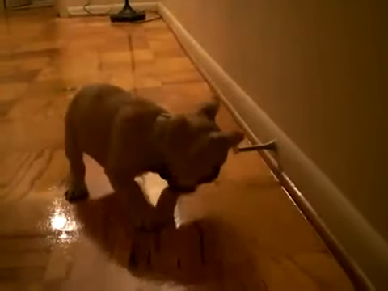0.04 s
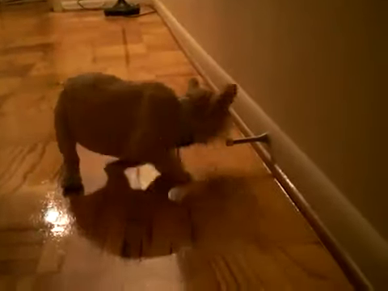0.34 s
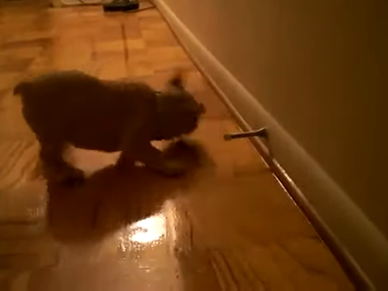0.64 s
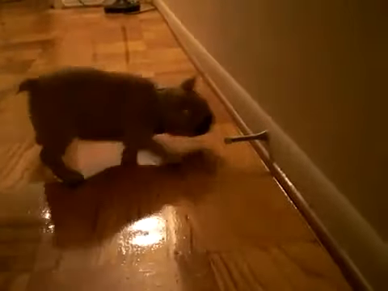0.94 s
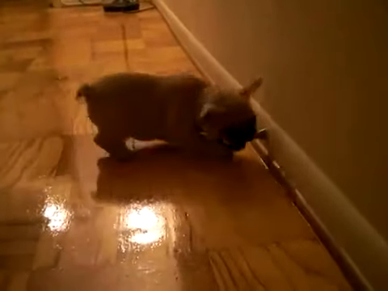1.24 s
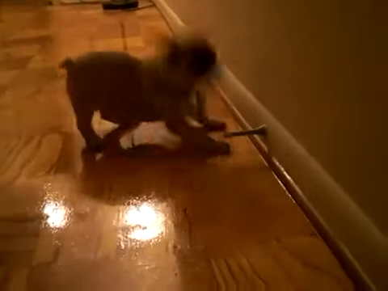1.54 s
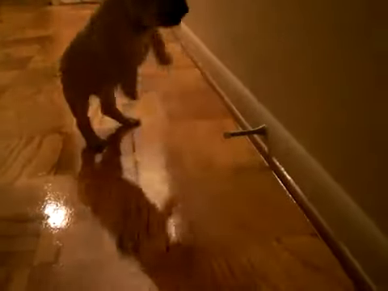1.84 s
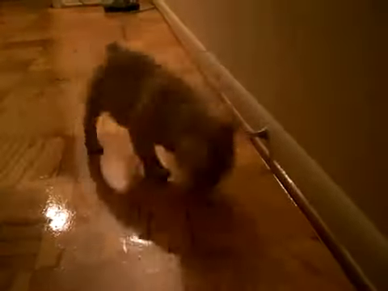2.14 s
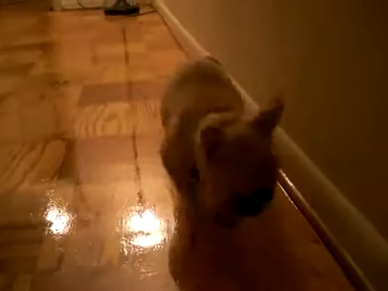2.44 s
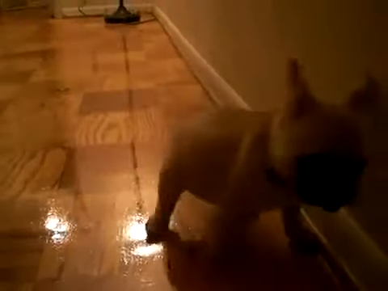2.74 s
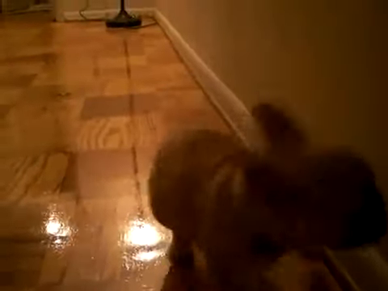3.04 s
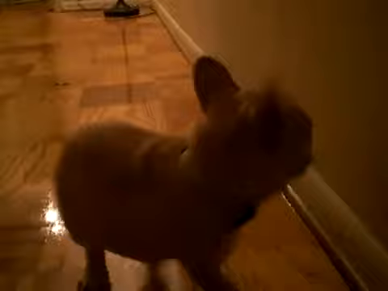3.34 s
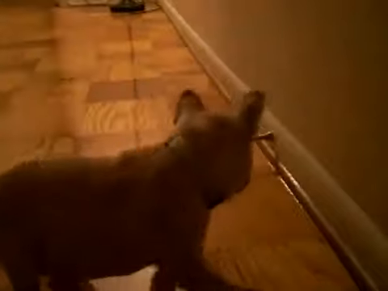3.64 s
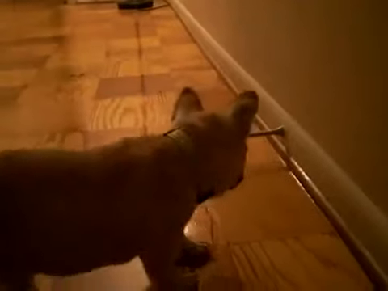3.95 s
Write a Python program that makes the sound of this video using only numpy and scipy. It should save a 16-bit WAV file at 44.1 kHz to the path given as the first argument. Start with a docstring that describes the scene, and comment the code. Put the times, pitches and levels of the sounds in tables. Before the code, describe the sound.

A metal spring door stop twangs, buzzes and rattles as a puppy paws at it.

```python
"""A quiet room with a wooden floor: a puppy paws at a spring door stop on the skirting board.
Its paws skid and scrape and its collar tag clinks; it brushes the spring, then lets it fly.
At each swing the coils slap shut: a short falling chirp knocks the board and the coils chatter."""
import sys
import numpy as np
from scipy import signal
from scipy.fft import rfft, irfft
from scipy.io import wavfile
from scipy.ndimage import uniform_filter1d

SR = 44100
rng = np.random.default_rng(int(sys.argv[2]) if len(sys.argv) > 2 else 0)


def waveform_to_disk(signal):
    """Save audio, clipped to [-1, 1], as 16-bit WAV at the path in sys.argv[1]."""
    frames = np.transpose(np.atleast_2d(signal))
    scaled = np.clip(frames, -1, 1) * 32767
    samples = np.round(scaled).astype(np.int16)
    wavfile.write(sys.argv[1], SR, samples)


N = 176400
T = np.arange(N) / SR
CHIRP_S = 0.001266  # delay along the wire near 1 kHz
CONTACT_S, GRIT_RISE_S, REBOUND_DB = 0.0008, 0.0007, -13
# loose coil buzz between slaps: t/s, level/dB
BUZZ_ENVELOPE = [(1.42, -60), (1.46, -39.5), (1.57, -41), (1.69, -39.5), (1.8, -47), (2.0, -55),
                 (2.12, -54.5), (2.22, -34.5), (2.55, -40), (2.7, -34), (2.83, -40.5), (3.2, -37),
                 (3.45, -40.5), (4, -42)]


def amp(db):
    """Decibels to gain."""
    return 10 ** (np.asarray(db) / 20)


def unit(x):
    """Scale to rms 1."""
    return x / np.sqrt(np.mean(x ** 2) + 1e-20)


def ring(x, response):
    """Play a signal through a response."""
    return signal.fftconvolve(x, response)[:N]


def body(colour, chirp_s=0, size=4096):
    """Causal response of an (f/Hz, level/dB) colour, peak 1; chirp_s makes the lows arrive later."""
    f = np.arange(size // 2 + 1) * SR / size + 1
    hz, db = np.array(colour).T
    cepstrum = irfft(np.log(amp(np.interp(np.log(f), np.log(hz), db))))
    cepstrum[1:size // 2] *= 2  # fold to minimum phase
    cepstrum[size // 2 + 1:] = 0
    lag_s = chirp_s * np.sqrt(1000 / (f + 100))
    response = irfft(np.exp(rfft(cepstrum) - 2j * np.pi * np.cumsum(lag_s) * SR / size))[:size // 2]
    return response / np.abs(response).max()


def tint(x, colour, chirp_s=0):
    """Colour a noise at constant power."""
    response = body(colour, chirp_s)
    return ring(x, response / np.linalg.norm(response))


def modes(rows, t=T[:SR]):
    """Fading sines from (f/Hz, level/dB, t60/s) rows."""
    return sum(amp(db) * np.sin(2 * np.pi * hz * t) * 1000 ** (-t / t60_s) for hz, db, t60_s in rows)


def pings(rows, t60_s):
    """Short fading tones from (t/s, level/dB, f/Hz) rows."""
    x, t = np.zeros(N + SR), T[:int(t60_s * SR) + 1]
    for s, db, hz in rows:
        start = int(s * SR)
        x[start:start + len(t)] += modes([(hz, db, t60_s)], t) * (1 - np.exp(-t * hz))
    return x[:N]


def blows(rows, delay_s=0):
    """An impulse for each (t/s, level/dB, ...) row."""
    x = np.zeros(N)
    for s, db, *_ in rows:
        x[int((s + delay_s) * SR)] += amp(db)
    return x


def swells(rows, rise_s, fall_s):
    """Envelope that rises to each (t/s, level/dB, ...) row and dies away."""
    envelope = np.zeros(N)
    for s, db, *_ in rows:
        a, b = np.searchsorted(T, [s - 4 * rise_s, s + 10 * fall_s])
        t = T[a:b] - s
        envelope[a:b] += amp(db) * np.exp(np.where(t < 0, -(t / rise_s) ** 2, -t / fall_s))
    return envelope


def ticks(per_s=3000):
    """Random tiny contacts, rms 1."""
    return unit(rng.standard_normal(N) * (rng.random(N) < per_s / SR))


def clumps(depth_db, length_s):
    """A gain that jumps about at random."""
    return amp(depth_db * unit(uniform_filter1d(rng.standard_normal(N), int(length_s * SR) + 1)))


def background():
    """Soft room air, an appliance's hum and a faint ring dying away at the start."""
    air_colour = [(15, -11), (25, -2), (92, -5.5), (149, -5.5), (301, -10.5), (607, -8.5), (714, -13),
                  (2760, -20), (3250, -27), (14800, -32.5), (16000, -34)]  # f/Hz, level/dB
    hum_tones = [(120, -60), (146.5, -56), (2826, -68.5)]  # f/Hz, rms level/dB
    faint_ring = [(568, -49.5, 1.2), (627, -49, 0.95)]  # f/Hz, level/dB, t60/s
    hum = sum(amp(db) * np.sqrt(2) * np.sin(2 * np.pi * (hz * T + rng.random())) for hz, db in hum_tones)
    air = amp(-50.5) * tint(rng.standard_normal(N), air_colour)
    return air + hum + np.pad(modes(faint_ring), (0, N - SR))


def room(x, delay_s=0.009):
    """Diffuse echo, shortest in the top treble."""
    bands = [(250, 0.63, 1.5), (900, 0.48, 0.5), (2170, 0.63, 0.5), (5850, 0.54, -8), (11900, 0.053, -3)]  # f/Hz, t60/s, level/dB
    f, t = np.arange(SR // 2 + 1) + 1., T[:SR]
    centres_hz = [hz for hz, _, _ in bands]
    spectrum, tail = rfft(rng.standard_normal(SR)), 0
    for share, (_, t60_s, db) in zip(np.eye(len(bands)), bands):
        band = irfft(spectrum * np.interp(np.log(f), np.log(centres_hz), share))
        fade = 1000 ** (-t / t60_s) * (t > delay_s)
        tail += amp(db) * band * fade / np.linalg.norm(fade)
    return amp(-5.5) * ring(x, tail)


def tag(top_rise_s=0.0035):
    """The metal tag ticks against the collar and rings in close, beating pairs."""
    clinks = [(0.7893, -25.5, -3), (.817, -45, 22), (0.8268, -26, 8.5), (0.876, -54.5, 25)]  # t/s, level/dB, top modes' offset/dB
    tag_modes = [(3600, -17, 0.06), (5230, -4, 0.12), (5240, -3, 0.1), (5233, -22.5, 0.4),
                 (11340, -12, 0.14), (11350, -12, 0.11)]  # f/Hz, level/dB, t60/s
    tick_colour = [(500, -14), (1800, -15), (3000, 1.5), (5500, -5), (7000, -6), (16000, -20)]  # f/Hz, level/dB
    hits = blows(clinks)
    top_hits = blows([(s, db + top_db) for s, db, top_db in clinks])
    top = modes(tag_modes[-2:]) * (1 - np.exp(-T[:SR] / top_rise_s))
    return ring(hits, modes(tag_modes[:-2])) + ring(top_hits, top) + amp(9) * ring(hits, body(tick_colour))


def rubbing():
    """Paws and collar catch and slip: bands of grainy noise."""
    rubs = [(0.385, 0.0037, 0.0097, -32.5, 1830, 900), (0.389, 0.0039, 0.023, -39, 7740, 6040),
            (.46, 0.048, 0.046, -44, 218, 159), (0.485, 0.008, 0.048, -41, 6450, 6070),
            (.635, 0.031, 0.071, -43, 12000, 7400), (.66, 0.025, 0.1, -35, 1760, 1050),
            (0.661, .012, 0.028, -32, 4540, 1450), (.825, 0.02, 0.031, -44, 11940, 2500),
            (1.08, 0.069, 0.46, -52.5, 7100, 9000), (1.196, 0.058, 0.029, -33, 12900, 3940),
            (1.195, 0.033, 0.018, -44.5, 730, 1050), (1.259, 0.005, 0.033, -40, 3220, 700),
            (1.27, 0.11, 0.06, -43.5, 7900, 10500), (1.54, 0.057, 0.07, -43, 1100, 1200),
            (1.595, 0.0085, 0.0092, -42, 3130, 400), (1.685, 0.012, 0.015, -38.5, 3200, 300),
            (1.75, 0.19, 0.081, -49.5, 14700, 4000)]  # t/s, rise/s, fall/s, level/dB, centre/Hz, width/Hz
    f = np.arange(N // 2 + 1) * SR / N + 1
    grip, out = clumps(depth_db=2, length_s=0.005), 0
    for s, rise_s, fall_s, db, hz, width_hz in rubs:
        band = (1 + ((f / hz - hz / f) * hz / width_hz / 2) ** 2) ** -2
        friction = unit(irfft(rfft(ticks(per_s=9000) * grip) * band, N))
        out += swells([(s, db)], rise_s, fall_s) * friction
    return out


def claws():
    """Claws tap the floorboards."""
    taps = [(.166, -32), (.6385, -18), (.641, -24), (.662, -24), (.7295, -19.5), (1.3305, -26)]  # t/s, level/dB
    tap_colour = [(200, -35), (1000, -0.5), (1600, -9.5), (2050, 6.5), (2900, -15), (4600, -11),
                  (7000, -18), (16000, -32)]  # f/Hz, level/dB
    return ring(blows(taps), body(tap_colour, chirp_s=0.001155))


def skid(start_s=0.3822, period_s=0.0226, squeak_hz=1875, sag_hz_per_s=6200):
    """A paw judders: the pad drags after each catch, and the squeak falls as it slows."""
    catch_levels = [-25, -16.5, -19, -24, -28, -32]  # level/dB
    skid_colour = [(80, -12), (200, -6), (420, -3.5), (1100, -6), (1700, 6), (2300, -3), (5000, -15),
                   (10000, -21), (16000, -30)]  # f/Hz, level/dB
    catches = [(start_s + k * period_s, db) for k, db in enumerate(catch_levels)]
    drag = amp(-24.5) * swells(catches, GRIT_RISE_S, fall_s=0.0051) * ticks()
    judder = ring(blows(catches) + drag, body(skid_colour, chirp_s=0.000696))
    squeaks = [(s, db - 12, squeak_hz - sag_hz_per_s * (s - start_s)) for s, db in catches]
    return judder + pings(squeaks, t60_s=0.013)


def coil_buzz():
    """Loose coils buzz in small uneven clumps."""
    buzz_colour = [(200, -4), (550, 12), (1000, 14.5), (2400, 6), (3500, 1), (6800, -3), (8000, -3),
                   (11000, -4), (16000, -19)]  # f/Hz, level/dB
    envelope = amp(np.interp(T, *np.array(BUZZ_ENVELOPE).T))
    crackle = unit(ticks() * clumps(depth_db=4, length_s=0.002))
    return tint(envelope * crackle, buzz_colour, CHIRP_S)


def coil_pings(contacts, spread_s=0.0043, strays_per_band_per_s=110):
    """Single coils ping at their own pitches: two per band at each slap, strays during the buzz."""
    bands = [(1095, 2130, 3), (2140, 5080, 1), (5250, 7360, -1.5), (8830, 14000, -8.5)]  # low/Hz, high/Hz, level/dB
    buzz_s, buzz_db = np.array(BUZZ_ENVELOPE).T
    rows = []
    for low_hz, high_hz, band_db in bands:
        span_hz = high_hz - low_hz
        for s, db in contacts:
            for late, pitch in rng.random((2, 2)):
                rows.append((s + spread_s * (2 * late - .5), db + band_db - 2.5, low_hz + span_hz * pitch))
        for when, pitch, size, chance in rng.random((N // 100, 4)):
            s = when * T[-1]
            if s > buzz_s[0] and chance < strays_per_band_per_s * 100 / SR:
                db = np.interp(s, buzz_s, buzz_db) + band_db + 0.5 + 10 * size
                rows.append((s, db, low_hz + span_hz * pitch))
    return pings(rows, t60_s=0.011)


def coil_chatter(contacts, fall_s=0.003):
    """The coils snap together, chatter and grate sideways, now more, now less."""
    chatter_colour = [(400, 5.5), (1200, 9), (2400, 11), (3400, 1.5), (7000, 1), (8000, -1.5), (10000, -8),
                      (13000, -14), (16000, -14)]  # f/Hz, level/dB
    grates = [(2.7991, -32.5), (2.8502, -25.5), (2.8515, -34), (3.2825, -27.5), (3.318, -31)]  # t/s, level/dB
    grate_colour = [(2500, -38), (10000, 17), (16000, -20)]  # f/Hz, level/dB
    snap = amp(-22) * ring(blows(contacts), body(chatter_colour, CHIRP_S))
    envelope = amp(-1) * swells(contacts, rise_s=0.002, fall_s=fall_s)
    grating = amp(-16.5) * envelope * clumps(depth_db=4, length_s=0.027)
    grating += swells(grates, GRIT_RISE_S, fall_s)
    chatter = tint(envelope * ticks(), chatter_colour, CHIRP_S)
    return snap + chatter + tint(grating * ticks(), grate_colour, CHIRP_S)


def twang(slaps):
    """Slaps and a few other blows each set one bending mode of the spring ringing."""
    bends = [(1.965, -25, 1390), (2.223, -12, 1080), (2.8545, -11.5, 684), (2.8535, -11, 1285),
             (3.052, -9, 1430), (3.053, -16, 760), (3.188, -15.5, 546)]  # t/s, level/dB, f/Hz
    return pings([(s + CHIRP_S, db - 4, hz) for s, db, _, hz in slaps] + bends, t60_s=0.045)


def knocks(slaps):
    """Each slap sends a falling chirp down the wire, with a rebound and a short rattle."""
    knock_colour = [(100, -32), (220, -42), (320, -21.5), (420, -13.5), (540, 0.5), (900, 3), (1400, 0.5),
                    (2300, -11.5), (2900, -23), (6500, -19), (8000, -28.5), (16000, -26)]  # f/Hz, level/dB
    hits = blows(slaps) + amp(REBOUND_DB) * blows(slaps, delay_s=0.00322)
    rattle = amp(-24.5) * swells(slaps, GRIT_RISE_S, fall_s=0.0063) * ticks()
    return ring(hits + rattle, body(knock_colour, CHIRP_S))


def cracks(split_hz=2340):
    """All coils shut at once: a hard knock and rebound below the split, a gritty crunch above."""
    hits = [(1.5344, -21, -2), (1.6658, -21, -8), (2.2842, -6.5, -5), (2.405, -13, -14), (2.5253, -4, -8),
            (2.6041, -1, -1.5), (2.8774, -3.5, -7.5), (3.0518, -5, -12.5), (3.1612, -3.5, -7),
            (3.291, -5, -12.5)]  # t/s, level/dB, treble offset/dB
    crack_colour = [(100, -17), (400, -9.5), (900, 6), (2700, -4), (5000, -1.5), (7500, -15), (16000, -17)]  # f/Hz, level/dB
    response = body(crack_colour, chirp_s=0.001991)
    f = np.fft.rfftfreq(len(response), 1 / SR)
    dull = irfft(rfft(response) / (1 + (f / split_hz) ** 4))
    low = blows(hits) + amp(REBOUND_DB) * blows(hits, delay_s=0.00176)
    edges = [(s, db + treble_db) for s, db, treble_db in hits]
    crunch = swells([(s + CONTACT_S, db - 20) for s, db in edges], GRIT_RISE_S, fall_s=0.0025) * ticks()
    return ring(low, dull) + ring(blows(edges) + crunch, response - dull)


def spring(treble_follow=0.52, low_cut_hz=336):
    """The swinging spring slaps shut; its knocks and cracks ring the skirting board."""
    # slaps: t/s, level/dB, brightness/dB, twang f/Hz
    nudges = [(1.363, -30, -11, 1170), (1.434, -17.5, -22, 1094), (1.457, -30, 17.5, 1250),
              (1.48, -16, -32, 940), (1.494, -24, -21, 1060), (1.513, -18.5, -37, 860),
              (1.533, -14.5, -23.5, 990), (1.607, -13.5, -26, 976), (1.665, -16, -14.5, 1397),
              (1.749, -18.5, -54, 1085), (1.778, -19, -48, 890), (1.854, -20, -33, 1400),
              (1.895, -18, -45, 805), (1.964, -18.5, -29, 1270), (2.001, -22.5, -44, 1380),
              (2.037, -25, -51, 1080), (2.071, -30, -43, 844)]  # the paw leans on the spring and slips off
    swings = [(2.143, -21.5, -29, 1210), (2.163, -17, -17, 820), (2.193, -12, -3, 770),
              (2.223, -5, -19.5, 875), (2.229, -8.5, -31, 870), (2.256, -13, -2.5, 790),
              (2.29, -6, -22, 921), (2.317, -10.5, -5, 810), (2.345, -10, -9, 830), (2.377, -9, -15, 880),
              (2.405, -5.5, -16, 855), (2.412, -18, -19, 890), (2.438, -12, -12, 925),
              (2.466, -8, -19, 1010), (2.472, -12, -19, 840), (2.498, -9, -13, 930),
              (2.556, -12.5, -7, 610), (2.636, -10.5, -17, 880), (2.665, -13.5, -11.5, 920),
              (2.694, -13.5, -55, 990), (2.725, -17, -12, 1140), (2.785, -15, -18, 1030),
              (2.798, -11, -31, 1250), (2.82, -15, -21, 880), (2.8535, -6, -21, 683),
              (2.9055, -7.5, -23, 990), (2.91, -7.5, -41, 914), (2.937, -14, -9, 1130),
              (2.995, -16, -1, 820), (3.024, -15, -7, 920), (3.0505, -12.5, -1.5, 880),
              (3.0545, -15.5, -24, 1010), (3.075, -11.5, -27, 903), (3.107, -12, -38, 800),
              (3.14, -7, -26, 855), (3.165, -12.5, -13, 890), (3.185, -17, -24, 930), (3.19, -7, -21, 910),
              (3.213, -15, -34, 820), (3.27, -9.5, -17, 870), (3.321, -10.5, -29, 815),
              (3.341, -15, -5, 1060), (3.353, -19.5, -24, 860), (3.37, -9.5, -13.5, 1065),
              (3.392, -20, -16, 820), (3.419, -13, -7, 776), (3.468, -15.5, -19, 640),
              (3.49, -10.5, -40, 850), (3.519, -15.5, -7, 955), (3.539, -19, -22, 905),
              (3.564, -13, -8.5, 1140), (3.616, -14.5, -14, 985), (3.633, -20, -13, 830),
              (3.659, -22, -17, 1140), (3.704, -15, -15, 1070), (3.726, -21.5, -11, 1170),
              (3.754, -18.5, -13, 900), (3.772, -16.5, -49, 965), (3.796, -15, -4.5, 614),
              (3.844, -15.5, -10.5, 1050), (3.861, -19, -17, 1080), (3.884, -13.5, -22, 900),
              (3.935, -15.5, -2.5, 1310), (3.948, -18, -33, 940), (3.971, -16, -16, 880)]  # the spring flies free
    board_modes = [(526.3, -33, 0.16), (851.6, -37.5, 0.28), (927, -35, 0.34), (1016, -35.5, 0.13),
                   (1087, -25, 0.032), (1412, -29, 0.11), (3067, -22, 0.065)]  # spring and board: f/Hz, level/dB, t60/s
    slaps = [(s + CONTACT_S, db + gain_db, bright_db, hz)
             for rows, gain_db in ((nudges, -4), (swings, -3.5)) for s, db, bright_db, hz in rows]
    contacts = [(s, db + treble_follow * bright_db) for s, db, bright_db, _ in slaps]
    crack, knock = cracks(), knocks(slaps)
    board = amp(-20) * ring(knock + crack, modes(board_modes))
    coils = coil_chatter(contacts) + coil_pings(contacts)
    low_cut = signal.butter(3, low_cut_hz, "high", fs=SR, output="sos")  # the knocks, board, twang and coils carry little deep bass
    return crack + coil_buzz() + signal.sosfilt(low_cut, knock + board + twang(slaps) + coils)


def scene():
    """Spring, paws and tag in the room, mono."""
    near = spring() + skid() + claws() + rubbing() + tag()
    return (near + room(near) + background())[None]


def record(dry, top_hz=16100):
    """Round the loudest peaks and cut the top."""
    return signal.sosfilt(signal.ellip(10, .2, 80, top_hz, fs=SR, output="sos"), np.tanh(dry))


dry = scene()
out = record(dry)
waveform_to_disk(out)
```